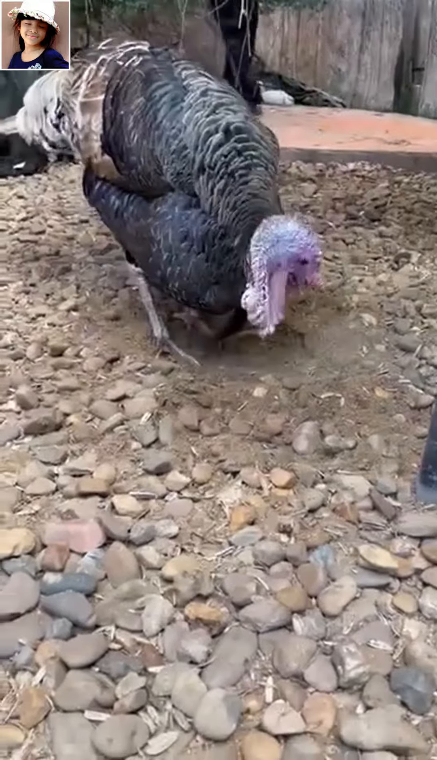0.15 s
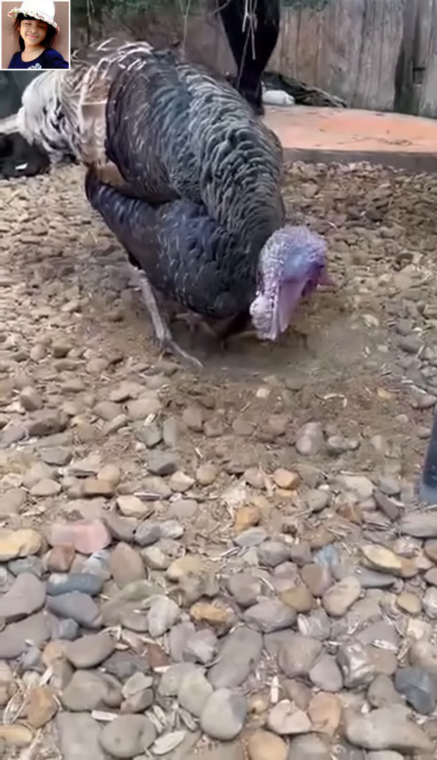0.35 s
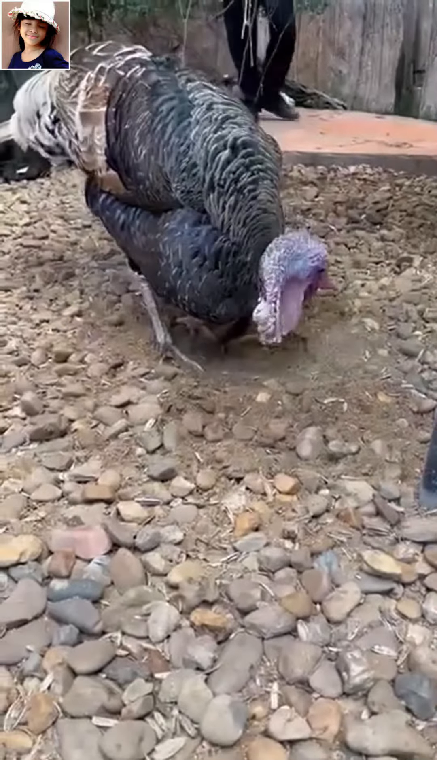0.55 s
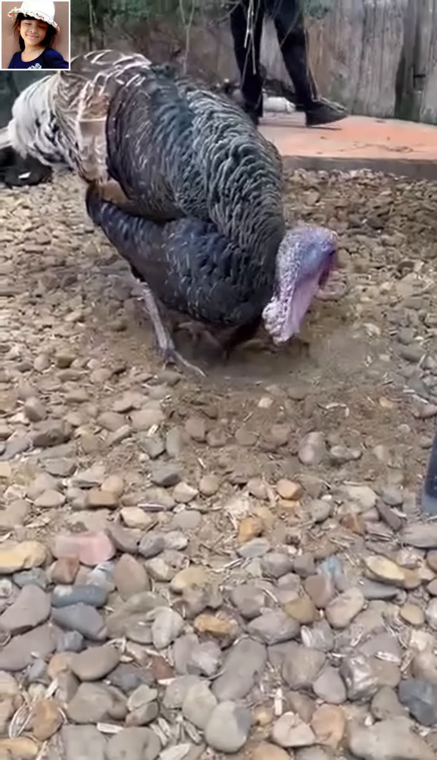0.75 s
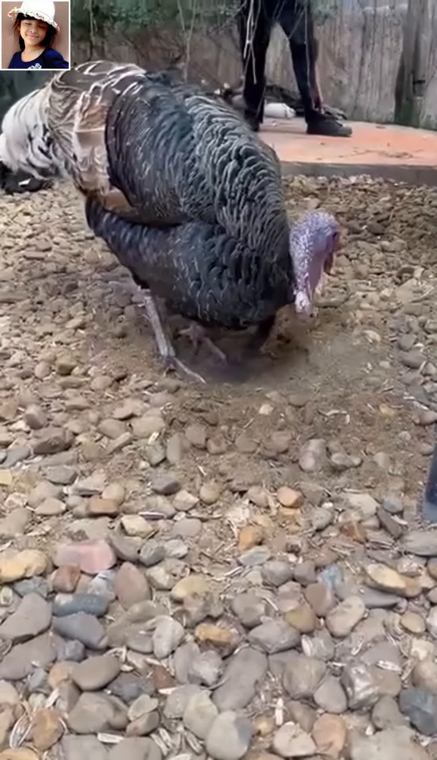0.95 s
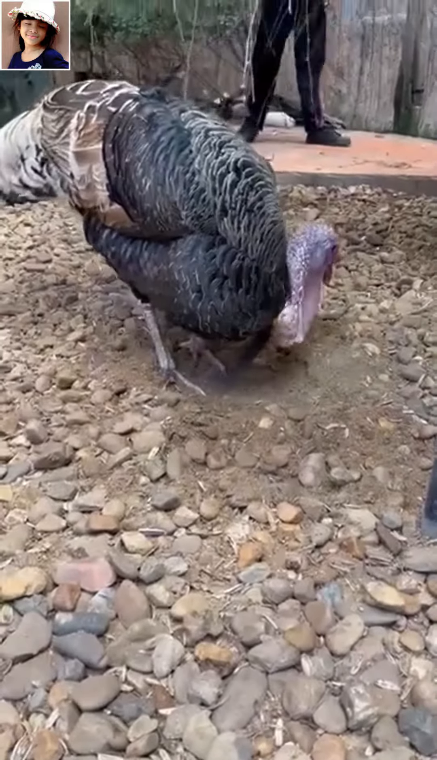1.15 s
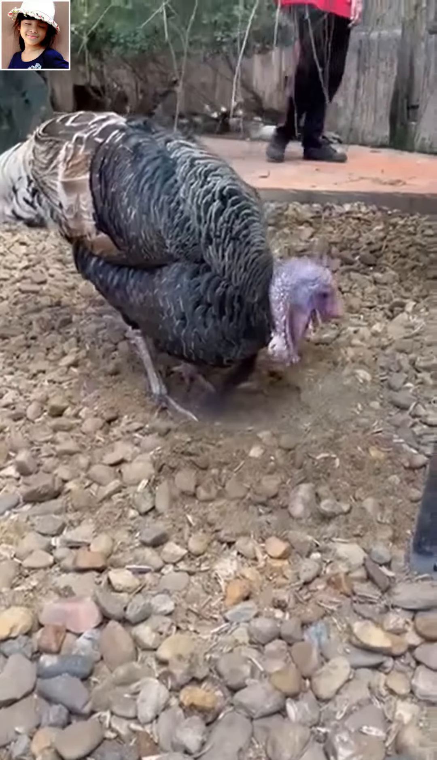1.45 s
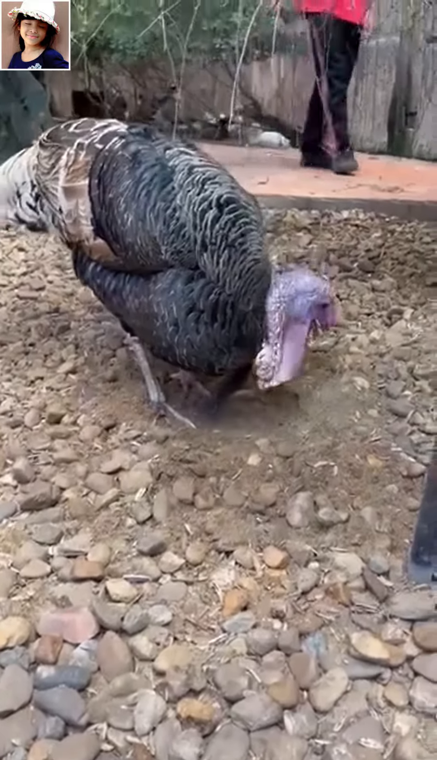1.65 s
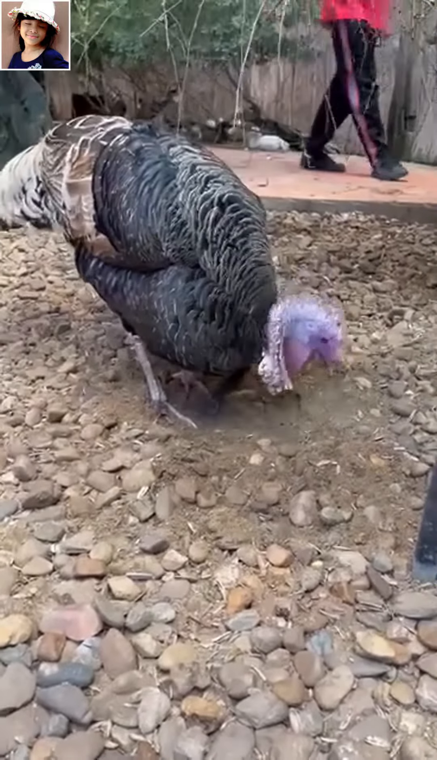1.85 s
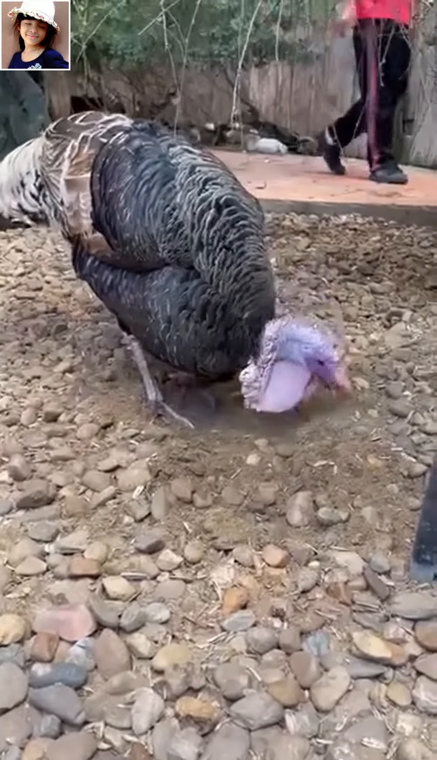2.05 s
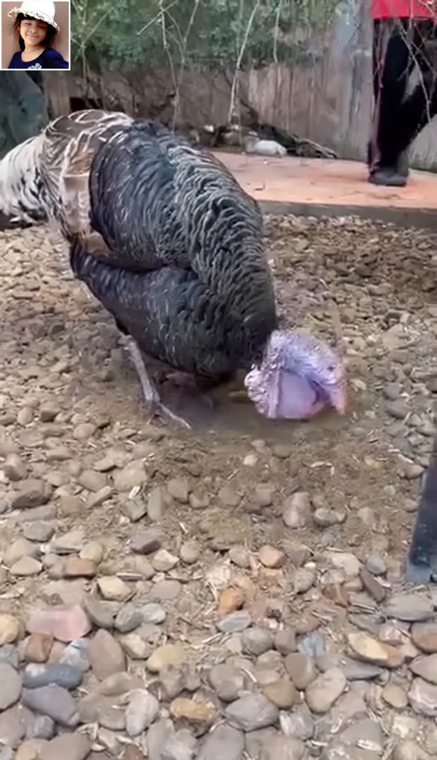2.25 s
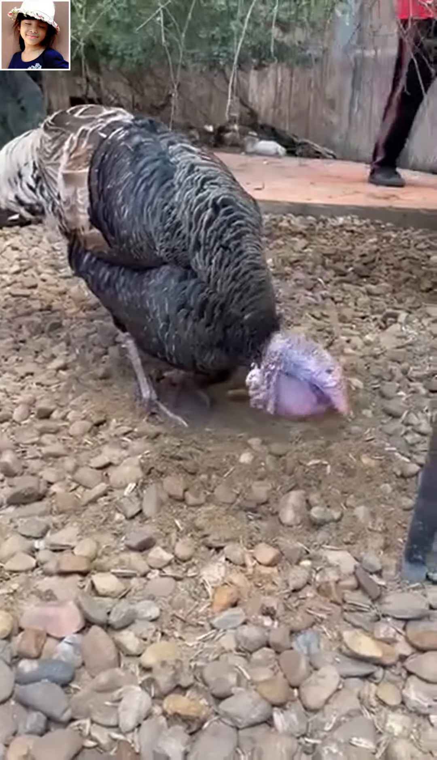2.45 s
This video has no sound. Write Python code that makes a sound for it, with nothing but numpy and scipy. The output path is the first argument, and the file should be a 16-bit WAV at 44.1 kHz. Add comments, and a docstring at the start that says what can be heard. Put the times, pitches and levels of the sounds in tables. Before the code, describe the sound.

Turkey gobble, loud and rattling, fills the last second outdoors; before it come soft microphone wind, faint hiss, tiny scuffs and three faint high whistles, with only short scatter from ground and fence.

```python
"""Light wind rumbles first on a pair of small microphones over faint hiss, with a few faint scuffs.
Three thin whistled notes follow, near-pure tones with an airy band a little below.
Then a turkey gobbles close by in the gravel yard, a fast string of hoarse syllables:
a jittered line near 1.2 kHz, an upper line, overtones, puffed rasp, hiss and a chest hum.
Short scatter off ground and fence surrounds the gobble and scuffs."""
import sys
import numpy as np
from scipy import signal
from scipy.fft import rfft, irfft
from scipy.io import wavfile
from scipy.ndimage import uniform_filter1d

SR = 44100
rng = np.random.default_rng(int(sys.argv[2]) if len(sys.argv) > 2 else 0)


def wav_record(signal):
    """Record a signal, one row per channel, as 16-bit PCM in the file named by sys.argv[1]."""
    frames = np.transpose(np.atleast_2d(signal))
    bounded = np.clip(frames, -1, 1)
    # unit amplitude maps onto the largest positive 16-bit level
    quanta = np.round(bounded * 32767).astype(np.int16)
    wavfile.write(sys.argv[1], SR, quanta)


def natural_amplitude(level_db):
    """Convert a level in decibels to a linear amplitude factor, elementwise."""
    exponent = np.asarray(level_db, float) / 20
    return 10 ** exponent


N = 114660
HZ = np.fft.rfftfreq(N, 1 / SR)
T = np.arange(N) / SR


def evened(x, size=0):
    """Scales to unit rms, overall or over a running window of size samples."""
    power = abs(uniform_filter1d(x ** 2, size)) if size else np.mean(x ** 2)
    return x / np.sqrt(power + 1e-12)


def read(points, hz):
    """Reads a (frequency, value) table along a log frequency axis."""
    f, value = np.transpose(points)
    return np.interp(np.log(hz + 1), np.log(f + 1), value)


def curves(rows):
    """Draws each column of a time table as a curve over the whole scene."""
    rows = np.array(rows, float)
    return [np.interp(T, rows[:, 0], col) for col in rows.T[1:]]


def shaped(x, gain):
    """Filters by a gain for each frequency."""
    return irfft(rfft(x, axis=-1) * gain, N, axis=-1)


def band(x, lo_hz, hi_hz):
    """Keeps a band with steep, smooth edges."""
    low_edge = 1 / (1 + (lo_hz / (HZ + 1)) ** 8)
    return shaped(x, low_edge / (1 + (HZ / hi_hz) ** 8))


def fuzzy(hz, width_hz):
    """Noise gathered around the curve hz: complex noise through two equal poles, then shifted up."""
    r = np.exp(-np.pi * width_hz / SR)
    z = rng.standard_normal(N) + 1j * rng.standard_normal(N)
    z = signal.lfilter([1], [1, -r], signal.lfilter([1], [1, -r], z))
    carrier = np.exp(2j * np.pi * np.cumsum(hz * np.ones(N)) / SR)
    return evened((z * carrier).real)


def mix(a, b, share):
    """Blends two sounds by power; share is the part of b."""
    share = np.clip(share, 0, 1)
    return np.sqrt(1 - share) * a + np.sqrt(share) * b


def bursts(rows, width_hz, rough=1):
    """Brief gliding notes, from pure (rough 0) to a band of noise (rough 1)."""
    out = np.zeros(N)
    for start, length, db, hz, end_hz in rows:
        u = np.clip((T - start) / length, 0, 1)
        glide = hz + (end_hz - hz) * u
        tone = np.sqrt(2) * np.sin(2 * np.pi * (np.cumsum(glide) / SR + rng.random()))
        swell = np.sin(np.pi * u) ** 0.6
        out += natural_amplitude(db) * swell * mix(tone, fuzzy(glide, width_hz), rough)
    return out


# Likeness of the noise at the two microphones: columns [f/Hz, likeness/0-1]
LIKENESS = [(60, .5), (400, .6), (3000, .05)]


def pair():
    """Two noises, partly alike, as two microphones hear a wide source."""
    a, b = rng.standard_normal((2, N))
    same = np.clip(read(LIKENESS, HZ), -1, 1)
    return np.array([a, shaped(a, same) + shaped(b, np.sqrt(1 - same ** 2))])


# Wind on the microphones, before its lumps and side tilt: columns [t/s, level/dB]
WIND_LEVEL = [(0, -47.5), (.2, -51.5), (.72, -51.5), (.79, -47), (1.02, -49), (1.47, -42), (1.6, -50),
              (2.09, -35.5), (2.6, -37)]
# Relative spectrum of the wind: columns [f/Hz, level/dB per Hz]
WIND_SPECTRUM = [(15, -0.5), (87, 6.5), (129, -2), (399, -23.5), (700, -38)]


def wind():
    """Lumpy low rumble: shaped noise with a randomly wandering level, stronger on the right."""
    lumps = natural_amplitude(3.2 * evened(uniform_filter1d(rng.standard_normal(N), size=2500)))  # 3.2 dB rms
    rumble = shaped(pair(), natural_amplitude(read(WIND_SPECTRUM, HZ)) * (HZ > 10))
    tilt = natural_amplitude([[-1.5], [1.5]])  # left, right
    return evened(rumble) * lumps * natural_amplitude(curves(WIND_LEVEL)[0]) * tilt


# Relative spectrum of the yard hiss: columns [f/Hz, level/dB per Hz]
YARD_SPECTRUM = [(300, -10.5), (623, -8.5), (799, -14), (2510, -16.5), (11900, -12), (15800, -19.5)]
# Rise of the yard hiss above its starting level: columns [t/s, level/dB]
YARD_RISE = [(.9, 0), (1.3, 7.5), (2.6, 13.5)]


def yard():
    """Faint smooth hiss of the place: shaped noise that grows slowly."""
    start_db = -64
    hiss = shaped(pair(), natural_amplitude(read(YARD_SPECTRUM, HZ)) * (HZ > 300))
    return evened(hiss) * natural_amplitude(start_db + curves(YARD_RISE)[0])


# Faint scuffs: columns [start t/s, length/s, level/dB, start f/Hz, end f/Hz]
SCUFF_ROWS = [(0.099, 0.035, -60, 7780, 7580), (0.177, 0.088, -56, 5940, 4550),
              (1, 0.046, -56.5, 5300, 5820), (1.222, 0.048, -62.5, 4820, 4490)]


def scuffs():
    """Brief bands of noise that glide in pitch."""
    return bursts(SCUFF_ROWS, width_hz=1800)


# Scatter relative to direct sound: columns [f/Hz, level/dB]
SCATTER = [(150, -16.5), (1200, -6.5), (2500, 11.5), (12000, 1)]


def echoes(x):
    """Short scatter off ground and fence: sparse, fast-dying random taps, others on each side."""
    t60_s = .035
    t = np.arange(6000) / SR
    hits = rng.random((2, len(t))) < .02
    taps = rng.standard_normal((2, len(t))) * hits * natural_amplitude(-60 * t / t60_s) * (t > .0003)
    taps /= np.linalg.norm(taps, axis=1, keepdims=True)
    return signal.fftconvolve(x[None], taps, axes=1)[:, :N]


def with_echoes(near):
    """Direct sound and scatter reach both microphones, sharing the power at each frequency."""
    wet = natural_amplitude(read(SCATTER, HZ))
    total = np.sqrt(1 + wet ** 2)
    return shaped(near, 1 / total) + shaped(echoes(near), wet / total)


def patchy(x):
    """Random patches in time and frequency swell and fade above about 2.8 kHz: shared in level, apart in phase."""
    level_db, phase_rad, from_hz = 6, .8, 2800  # level_db scales the mean of two unit-rms wanderings
    hz, _, z = signal.stft(x, SR, nperseg=256, noverlap=192)

    def wander():
        v = uniform_filter1d(rng.standard_normal(z.shape), size=24, axis=2)
        return evened(uniform_filter1d(v, size=2, axis=1))

    a, b = wander(), wander()
    depth = (1 / (1 + (from_hz / (hz + 1)) ** 4))[:, None]
    z = z * natural_amplitude(depth * level_db * a.mean(0)) * np.exp(1j * depth * phase_rad * b)
    return signal.istft(z, SR, nperseg=256, noverlap=192)[1][:, :N]


# Left microphone over right for the near sounds: columns [f/Hz, level/dB]
LEFT_OVER_RIGHT = [(300, 1), (1200, 0.5), (5000, 1), (12000, 4.5)]


def sided(x):
    """Tilts the near sounds between the two microphones, half the difference on each."""
    half = natural_amplitude(read(LEFT_OVER_RIGHT, HZ) / 2)
    return shaped(x, np.array([half, 1 / half]))


# Three whistled notes, one list each: columns [t/s, f/Hz, level/dB]
WHISTLE_NOTES = [
    [(.9, 2220, -73), (.954, 2382, -64.5), (.98, 2436, -45.5), (1.04, 2380, -78)],
    [(1.07, 2720, -80), (1.12, 2877, -49.5), (1.162, 2876, -60.5), (1.2, 2940, -75)],
    [(1.26, 2875, -72), (1.302, 2950, -46.5), (1.348, 2864, -48), (1.43, 2164, -48), (1.458, 2010, -42),
     (1.51, 1710, -57.5), (1.6, 1620, -90)],
]


def whistles():
    """Near-pure gliding notes with an airy noise band a little below."""
    air_ratio, air_db, air_follow = .76, -62, 0.82  # air_db holds when the note is at -51 dB
    out = np.zeros(N)
    for note in WHISTLE_NOTES:
        hz, db = curves(note)
        on = (T > note[0][0]) & (T < note[-1][0])
        tone = np.sqrt(2) * np.sin(2 * np.pi * np.cumsum(hz) / SR)
        tone += natural_amplitude(-10.5) * fuzzy(hz, width_hz=99)
        air = natural_amplitude(air_db + air_follow * (db + 51)) * fuzzy(air_ratio * hz, width_hz=330)
        out += on * (natural_amplitude(db) * tone + air)
    return out


# Main line of the gobble: columns [t/s, f/Hz, level/dB]
MAIN_LINE = [(1.63, 1001, -55), (1.646, 1046, -27), (1.67, 1250, -26), (1.694, 1303, -27),
             (1.718, 1249, -17.5), (1.734, 962.2, -35.5), (1.755, 1057, -46), (1.77, 1211, -30),
             (1.788, 1097, -25), (1.812, 1150, -76), (1.824, 1274, -37.5), (1.836, 1196, -12),
             (1.858, 974.1, -33), (1.87, 933.1, -35), (1.88, 1169, -23.5), (1.904, 1113, -13),
             (1.92, 1217, -28), (1.935, 1278, -22.5), (1.962, 1492, -27), (1.977, 1123, -15.5),
             (2.004, 1104, -42.5), (2.02, 1149, -24.5), (2.04, 1078, -12.5), (2.062, 1129, -45),
             (2.086, 1167, -15), (2.094, 1294, -18), (2.108, 1239, -39), (2.12, 938.7, -28.5),
             (2.148, 1132, -14), (2.166, 1223, -25), (2.188, 1253, -13), (2.202, 1123, -24),
             (2.212, 1172, -12), (2.234, 1159, -26), (2.262, 1013, -17), (2.29, 1058, -33),
             (2.326, 1193, -25.5), (2.34, 976.7, -15), (2.378, 1026, -51), (2.39, 1053, -28),
             (2.428, 1142, -19.5), (2.448, 1163, -24), (2.472, 1204, -16), (2.5, 1059, -15.5),
             (2.516, 1229, -21.5), (2.532, 1182, -15), (2.574, 1244, -23.5), (2.6, 924, -28)]
# Overtones and top hiss, before they drop with the main line: columns [t/s, overtone level/dB, top level/dB]
UPPER_LEVELS = [(1.629, -48, -67), (1.666, -25.5, -31), (1.72, -38, -39.5), (1.76, -42.5, -61),
                (1.815, -30.5, -56), (1.836, -30.5, -36.5), (1.864, -39, -37.5), (1.929, -20.5, -25.5),
                (1.957, -25.5, -26.5), (1.996, -48.5, -48), (2.04, -43, -54), (2.064, -44.5, -51),
                (2.082, -36.5, -30.5), (2.111, -42.5, -48), (2.162, -25.5, -31.5), (2.209, -35, -26),
                (2.23, -43.5, -48), (2.298, -25, -21.5), (2.326, -29.5, -33), (2.348, -59, -74),
                (2.38, -23, -14.5), (2.406, -46.5, -80), (2.446, -32, -37.5), (2.519, -32, -25.5),
                (2.574, -27.5, -31.5), (2.6, -56, -60)]
# Noise share of the overtones: columns [t/s, share/0-1]
NOISE_SHARE = [(1.63, .6), (1.87, .6), (1.9, .15), (1.96, .2), (2.1, .5), (2.17, .25), (2.3, .9), (2.5, .5)]
# Colour of rasp and overtones: columns [f/Hz, level/dB per Hz]
RASP_COLOUR = [(250, -27), (600, -40.5), (800, -21), (1150, 6), (1430, -1), (2350, -18.5), (3170, -20),
               (4870, -19.5), (9300, -33.5), (11400, -13.5), (13500, -30.5), (15900, -42.5)]


def gobble():
    """A jittered line, overtones with half lines, and a rasp puffed once every two cycles of the line."""
    (hz, db), (treble_db, top_db), (rough,) = map(curves, (MAIN_LINE, UPPER_LEVELS, NOISE_SHARE))
    jitter = .0045  # rms, as a share of the frequency
    shake = 1 + jitter * evened(uniform_filter1d(rng.standard_normal(N), size=90))
    turns = np.cumsum(hz * shake) / SR
    colour = natural_amplitude(read(RASP_COLOUR, HZ))

    puffs = 0.12 + np.exp(-(turns / 2 % 1) / 0.41)
    rasp = shaped(puffs * rng.standard_normal(N), colour)
    # odd k are the half lines, 7.5 dB weaker
    stack = sum(natural_amplitude(-7.5 * (k % 2)) * np.cos(np.pi * k * turns) for k in range(3, 28))
    stack = shaped(stack, colour)

    main = mix(np.sqrt(2) * np.cos(2 * np.pi * turns), fuzzy(hz, width_hz=161), .06)
    main += natural_amplitude(-10) * evened(band(rasp, 268, 974))  # broad rasp
    middle = mix(evened(band(stack, 2600, 3010)), evened(band(rasp, 1887, 2880)), rough + 0.32)
    treble = mix(evened(band(stack, 4100, 5940), size=600), evened(band(rasp, 5400, 9670)), rough)
    top = mix(evened(band(stack, 11600, SR / 2), size=600), evened(band(rasp, 8700, SR / 2)), rough)

    # when the main line drops below shut_db, the upper layers drop with it
    shut_db, shut_share = -19.5, 0.53
    shut = natural_amplitude(shut_share * np.minimum(db - shut_db, 0))
    middle_db = -32 + 0.5 * (treble_db + 36.5)  # follows the overtones
    layers = natural_amplitude(db) * main
    layers += shut * (natural_amplitude(middle_db) * middle + natural_amplitude(treble_db) * treble)
    layers += np.sqrt(shut) * natural_amplitude(top_db) * top
    return layers * (T > MAIN_LINE[0][0])


# Surges of chest hum: columns [start t/s, length/s, level/dB, start f/Hz, end f/Hz]
CHEST_SURGES = [(1.63, 0.092, -37, 125.8, 130), (1.76, 0.18, -36, 144.6, 118.6),
                (2, 0.095, -32.5, 119.3, 126.6), (2.15, 0.082, -34.5, 116, 137),
                (2.28, 0.19, -32.5, 125.4, 145.7), (2.55, .045, -38.5, 420, 373)]


def chest():
    """Low hum in surges: gliding tones blended with narrow noise."""
    return bursts(CHEST_SURGES, width_hz=35, rough=0.68)


# Notes of the upper line: columns [start t/s, length/s, level/dB, start f/Hz, end f/Hz]
UPPER_NOTES = [(1.642, 0.052, -18, 2100, 2727), (1.822, 0.06, -26, 1880, 2246),
               (1.915, 0.03, -25.5, 1915, 1976), (1.915, 0.031, -25, 2548, 2933),
               (2.07, 0.027, -20, 1950, 2115), (2.125, 0.039, -17.5, 2089, 2325),
               (2.198, 0.016, -13, 2466, 2397), (2.238, 0.028, -20, 2393, 2364),
               (2.272, 0.041, -20, 1814, 1627), (2.475, 0.057, -28, 1870, 1976),
               (2.52, 0.023, -20.5, 1900, 1880)]


def upper_line():
    """Short gliding notes above the main line, partly roughened by noise."""
    return bursts(UPPER_NOTES, width_hz=161, rough=.3)


# Bright rings: columns [start t/s, length/s, level/dB, start f/Hz, end f/Hz]
BRIGHT_RINGS = [(1.65, 0.02, -28, 5120, 5200), (2.46, 0.12, -23, 4830, 4938)]


def rings():
    """Bright ringing in the gobble: narrow noise with barely any pure tone."""
    return bursts(BRIGHT_RINGS, width_hz=130, rough=0.99)


# One sharp hiss: columns [start t/s, length/s, level/dB, start f/Hz, end f/Hz]
SHARP_HISS = [(2.282, 0.0457, -24.5, 5470, 5295)]


def bite():
    """One sharp hiss within the gobble, a wide gliding band of noise."""
    return bursts(SHARP_HISS, width_hz=1800)


def scene():
    """Bird and scuffs with their echoes, then whistles, wind and yard on both microphones."""
    near = scuffs() + gobble() + chest() + upper_line() + rings() + bite()
    return sided(patchy(with_echoes(near))) + whistles() + wind() + yard()


def low_pass(x):
    """Removes everything above the highest recorded frequency."""
    return signal.sosfilt(signal.butter(12, 15980, fs=SR, output="sos"), x)


def record(dry):
    """Passes on the finished mix."""
    return low_pass(dry)


dry = scene()
out = record(dry)
wav_record(out)
```